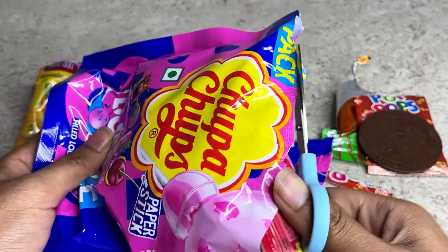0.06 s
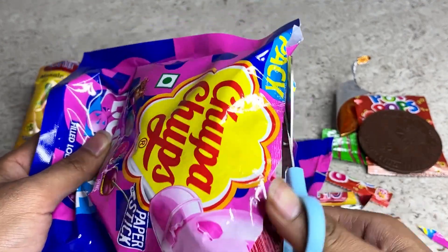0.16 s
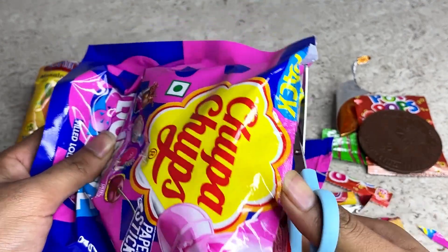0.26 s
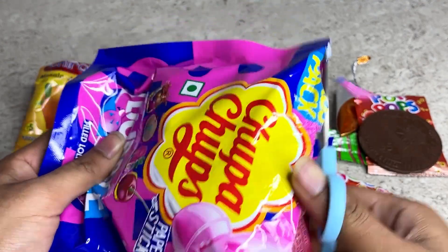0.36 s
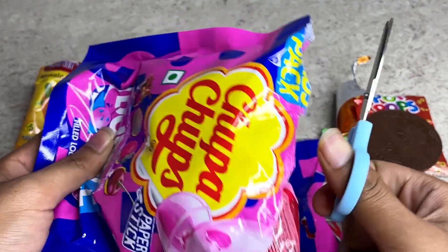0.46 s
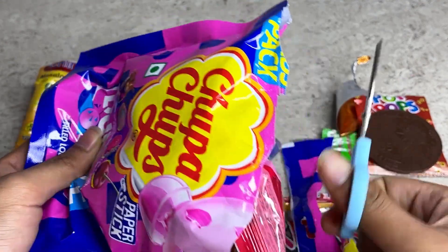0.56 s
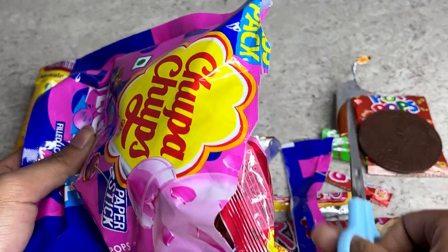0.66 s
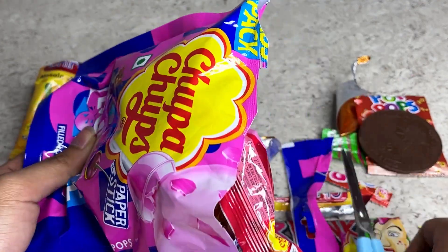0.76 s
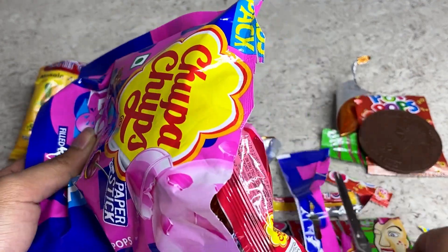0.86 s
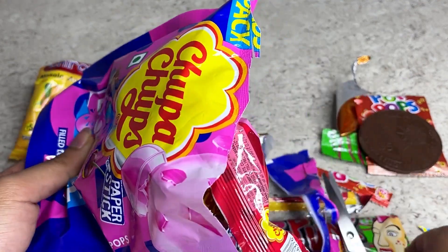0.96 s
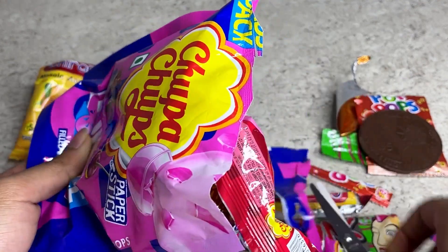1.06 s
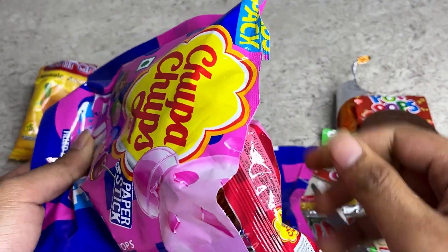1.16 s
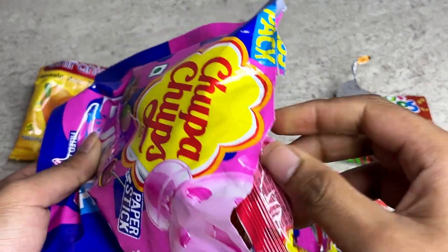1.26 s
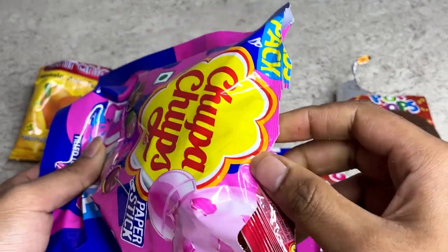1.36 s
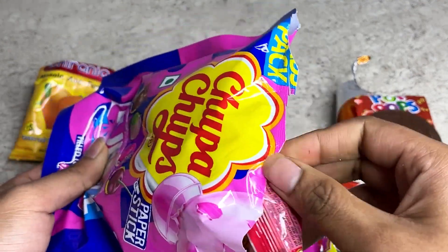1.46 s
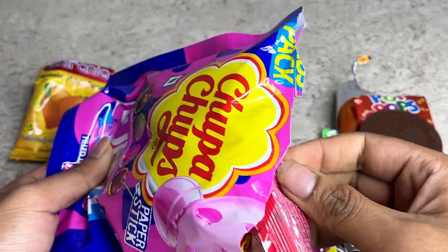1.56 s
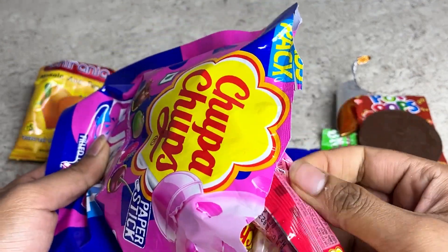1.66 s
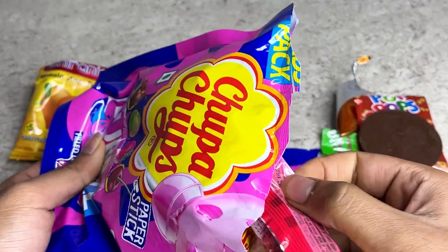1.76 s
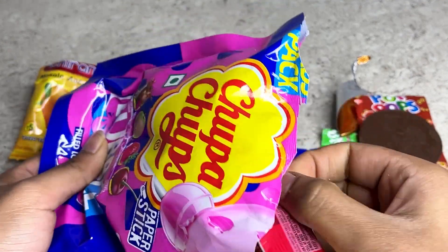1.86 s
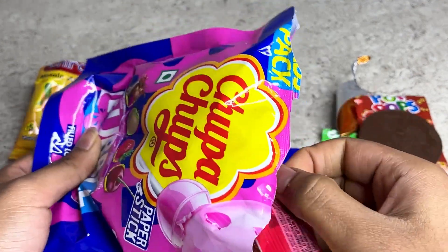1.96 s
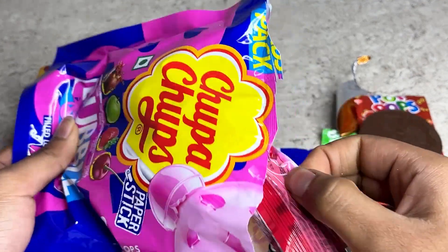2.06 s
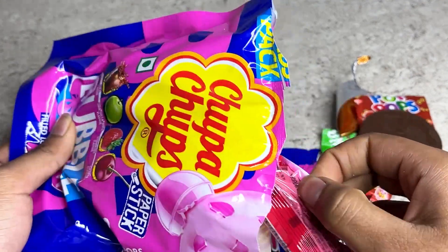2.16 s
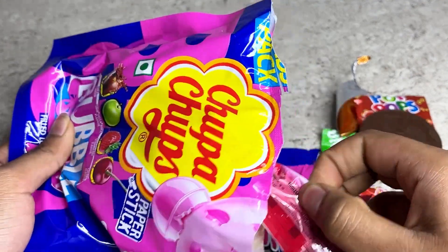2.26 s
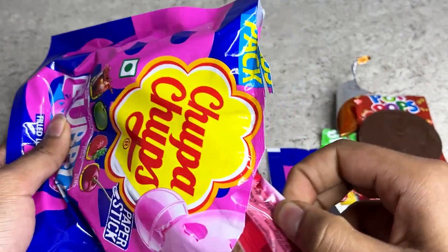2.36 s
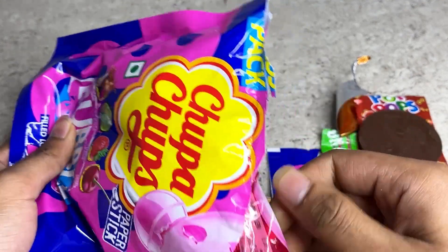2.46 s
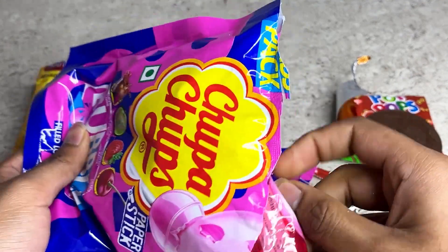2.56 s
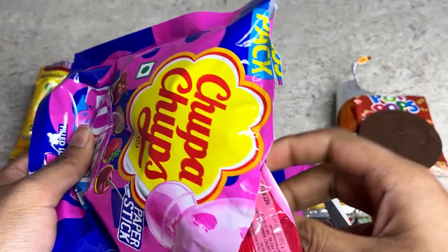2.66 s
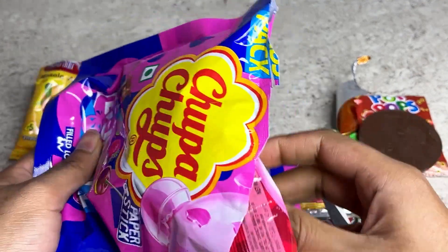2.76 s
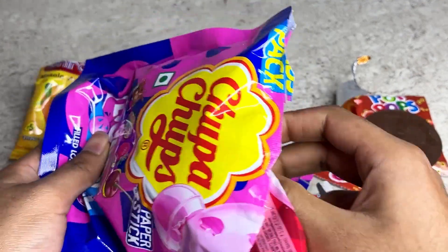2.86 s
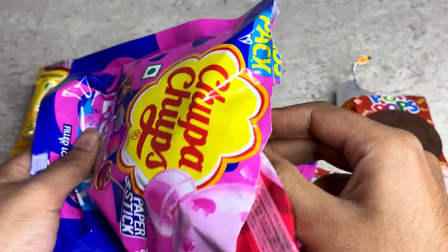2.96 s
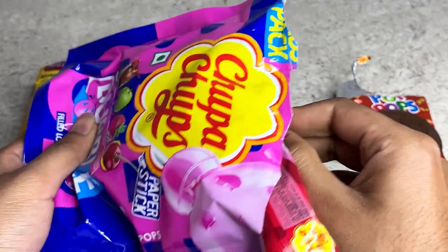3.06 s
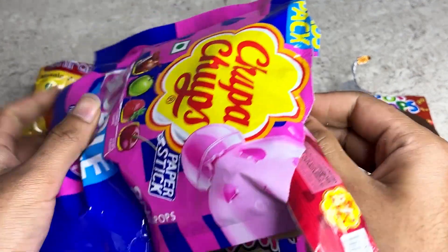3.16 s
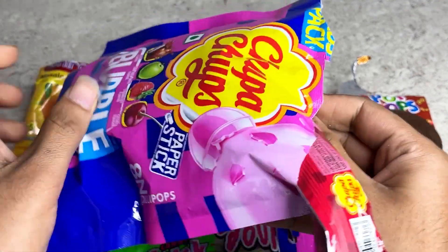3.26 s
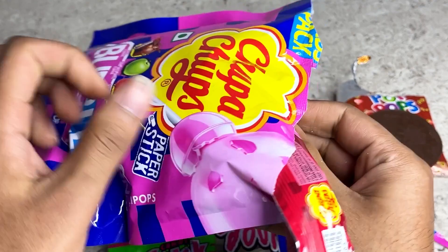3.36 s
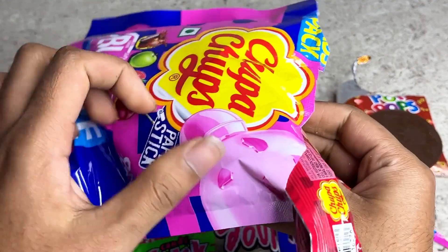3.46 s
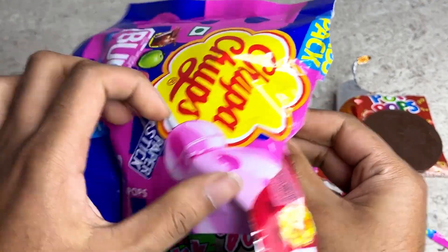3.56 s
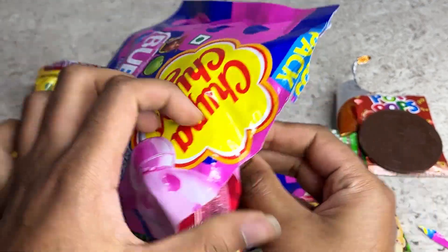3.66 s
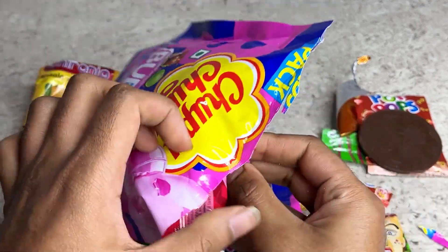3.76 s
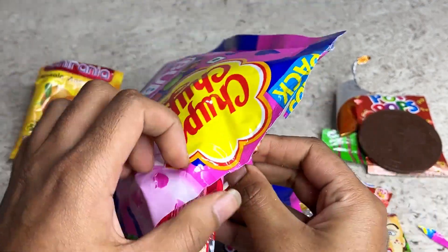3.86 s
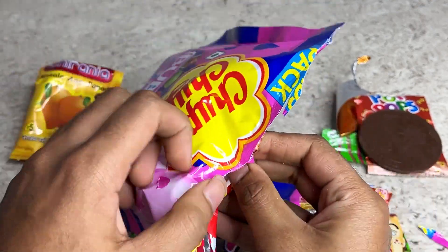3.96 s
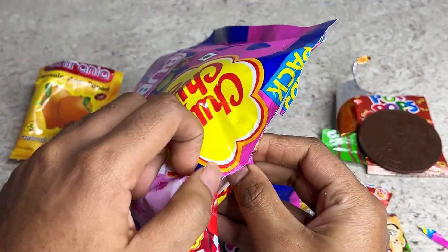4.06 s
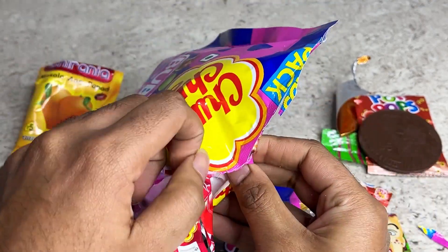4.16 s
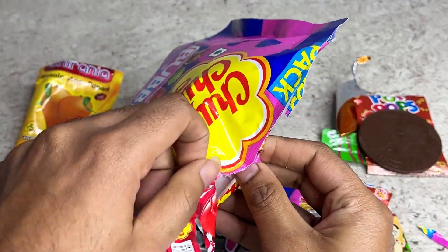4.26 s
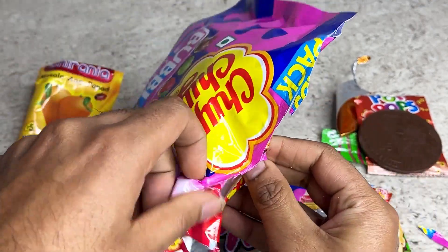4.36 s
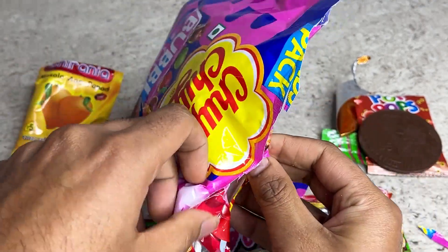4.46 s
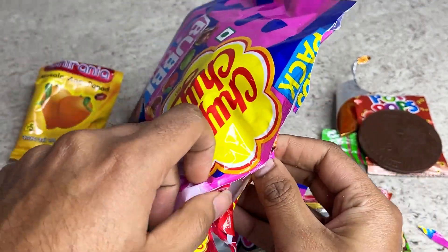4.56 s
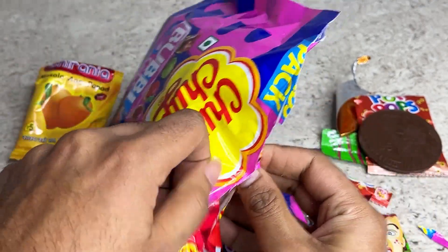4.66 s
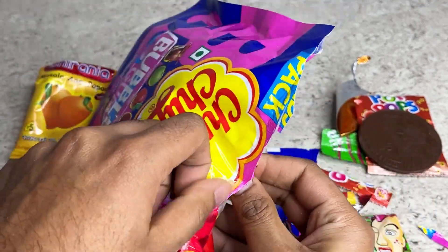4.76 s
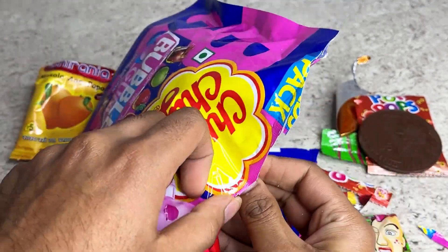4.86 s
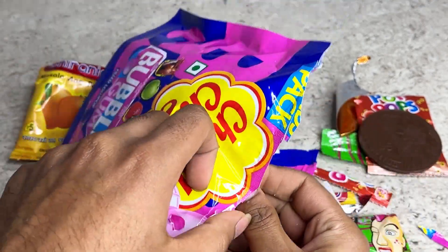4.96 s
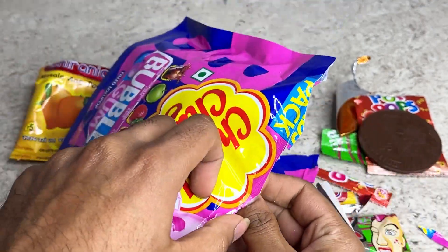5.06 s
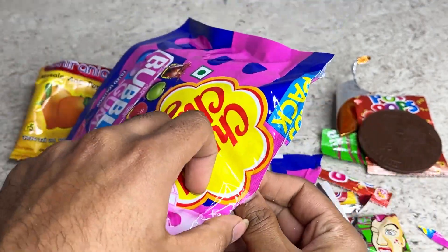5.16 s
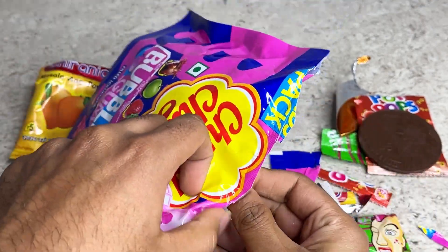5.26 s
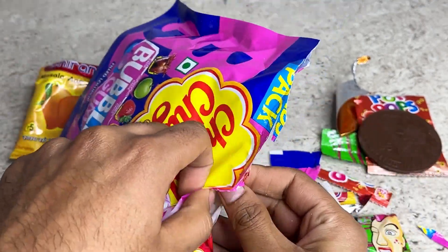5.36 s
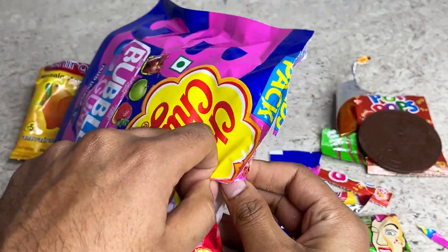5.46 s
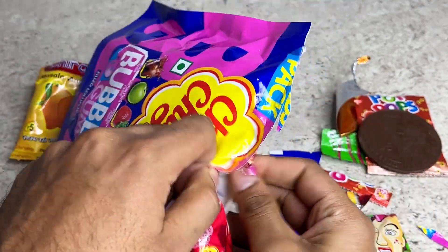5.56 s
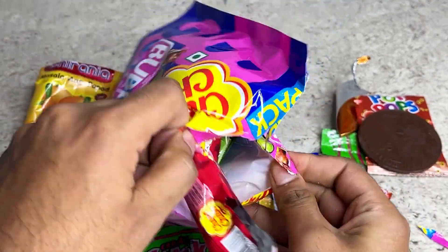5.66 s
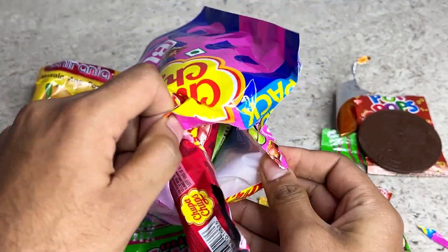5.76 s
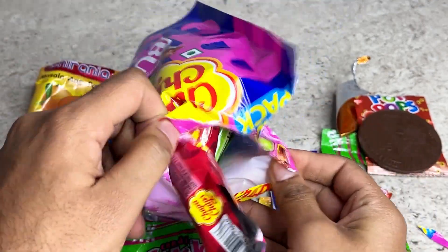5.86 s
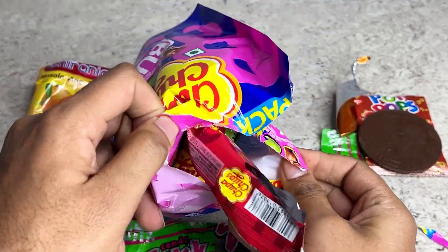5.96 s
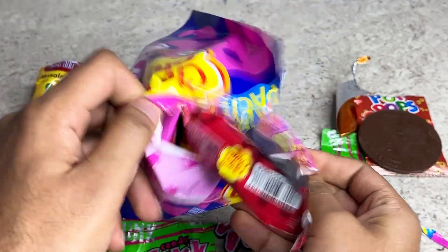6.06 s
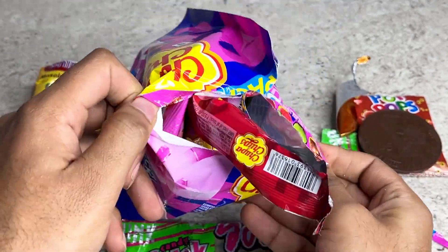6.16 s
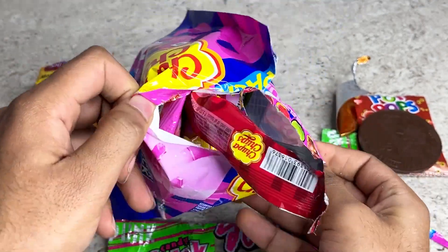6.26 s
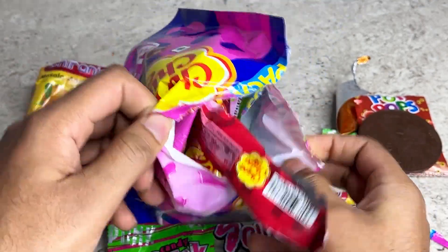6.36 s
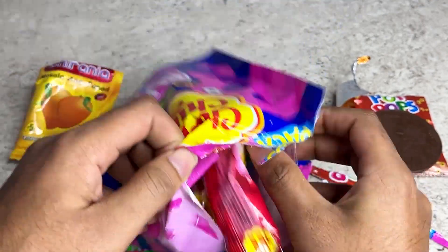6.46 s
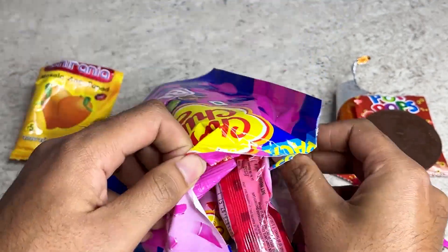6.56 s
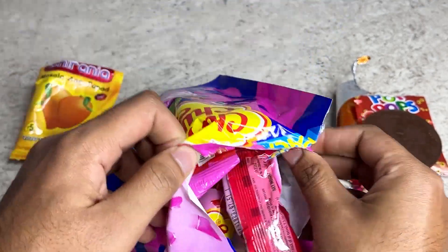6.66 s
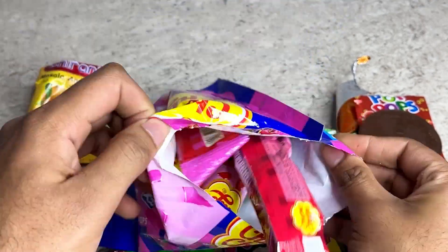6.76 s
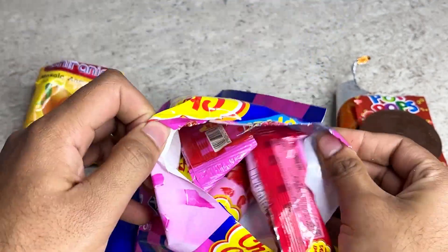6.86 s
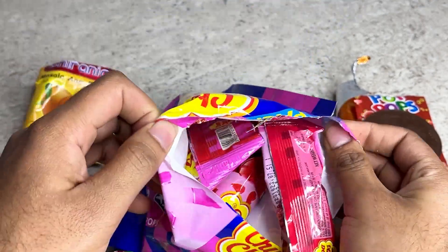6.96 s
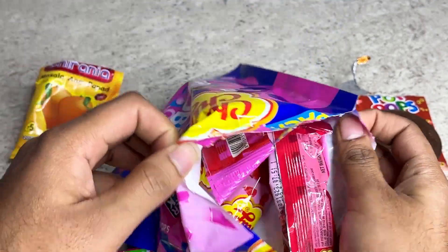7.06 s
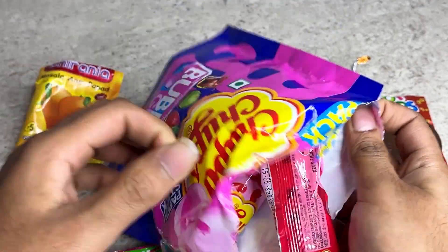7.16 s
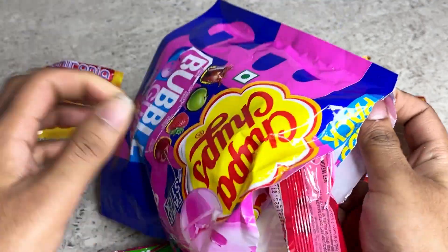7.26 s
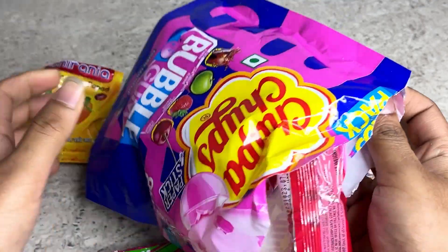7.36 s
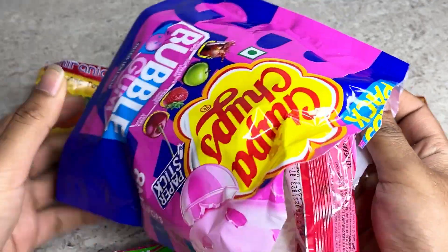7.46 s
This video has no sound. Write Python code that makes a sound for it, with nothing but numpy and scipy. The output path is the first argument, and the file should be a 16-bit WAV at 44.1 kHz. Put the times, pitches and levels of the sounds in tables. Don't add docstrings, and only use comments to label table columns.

```python
import sys
import numpy as np
from scipy import signal
from scipy.fft import rfft, irfft, next_fast_len
from scipy.io import wavfile
from scipy.ndimage import uniform_filter1d

SR = 44100
rng = np.random.default_rng(int(sys.argv[2]) if len(sys.argv) > 2 else 0)


def nominal_scale(level):
    x = np.asarray(level, float) / 20
    return 10 ** x


def to_wav(s):
    ch = np.atleast_2d(s).T
    pcm = np.round(np.clip(ch, -1, 1) * 32767)
    wavfile.write(sys.argv[1], SR, pcm.astype(np.int16))


N = 331191

# (frequency [Hz], level [dB per Hz])
FILM = [(600, -15), (1200, -4), (2800, 6.5), (5000, 10), (8000, 3.5), (12000, -7), (15500, -66)]

# (time [s], peak level [dB], ring frequency [Hz], treble crack re peak [dB])
CUT = [(.0862, -13.5, 2650, -26), (.1124, -13, 1970, 1), (.1336, -14.5, 900, 1), (.1399, -12.5, 3260, -0.5),
       (.2354, -10.5, 1240, -3), (.32, -17.5, 5100, -3), (.3382, -7.5, 2740, -11), (.392, -18, 430, -12),
       (.4777, -19, 3230, -3), (.593, -25.5, 1160, -40), (.6546, -29, 2580, -50), (.724, -27, 1030, -37),
       (.7618, -25, 1320, -32), (.8427, -26, 3010, -21), (.862, -20, 2510, -7), (.875, -29, 2550, 5),
       (.9428, -15, 3920, -4), (1.0452, -10.5, 3600, -12), (1.0734, -8.5, 4870, -25),
       (1.136, -20, 1030, -7)]
# (time [s], peak level [dB], ring frequency [Hz], crack re peak [dB])
REACH = [(1.318, -19, 2620, 3), (1.3399, -19, 4600, 6.5), (1.375, -23, 3140, -6), (1.462, -12, 4900, -2.5),
         (1.5565, -12.5, 4660, -6), (1.5647, -19.5, 1470, 2), (1.6093, -12.5, 4840, -5),
         (1.625, -9.5, 2800, -5), (1.6467, -11.5, 2900, -5), (1.691, -12, 5700, 0.5),
         (1.725, -10.5, 2880, -15), (1.808, -20.5, 2830, -32), (1.8385, -20.5, 2760, 4),
         (1.8717, -14.5, 2920, -16), (1.9789, -16, 3020, -4), (1.9908, -8, 3000, -7.5),
         (1.9997, -14, 2690, -29), (2.0963, -15, 2750, -6), (2.1429, -14, 5440, 6.5),
         (2.1883, -13.5, 4600, 1), (2.204, -11, 4640, -8)]
# (time [s], peak level [dB], ring frequency [Hz], crack re peak [dB])
PULL = [(2.26, -16, 1150, -3), (2.2786, -10, 2290, -10), (2.2895, -4, 4070, -7), (2.4131, -4.5, 4020, -7),
        (2.4957, -10.5, 2140, 1.5), (2.5059, -14.5, 2950, -17), (2.5151, -14, 5060, -8),
        (2.535, -19, 2870, -1), (2.57, -14, 3000, -26), (2.6, -7.5, 3230, -17), (2.6094, -19, 1400, 5),
        (2.625, -4.5, 3000, -21), (2.6305, -13, 2920, 6), (2.7123, -10.5, 2670, -22),
        (2.749, -18, 1090, -5), (2.784, -12.5, 2760, -17), (2.8003, -12.5, 2800, -1),
        (2.8373, -12.5, 2700, -7.5), (2.8526, -17.5, 2680, 1), (2.8945, -5.5, 4400, -14),
        (2.954, -10.5, 2800, -1), (2.975, -12, 3920, -2.5), (3, -8, 2900, -2), (3.0114, -7, 2650, -7),
        (3.0268, -7, 4370, 0), (3.0363, -7.5, 4400, -23), (3.053, -12.5, 2730, 5)]
# (time [s], peak level [dB], ring frequency [Hz], crack re peak [dB])
REGRIP = [(3.1152, -11, 2720, -11), (3.153, -12.5, 2870, -7), (3.212, -10, 4400, 6.5),
          (3.2402, -9, 5740, -13), (3.2649, -5.5, 1820, -24), (3.341, -23, 4440, -3),
          (3.3626, -18, 4500, 3), (3.3684, -15.5, 2230, -3), (3.386, -15.5, 3300, 2.5),
          (3.4315, -11.5, 4000, -7.5), (3.5161, -10.5, 1490, -6.5), (3.601, -18, 3050, -3),
          (3.6388, -21, 2070, 4.5), (3.651, -15, 2840, -10), (3.682, -11.5, 3600, -4.5),
          (3.7297, -16.5, 3600, 6.5), (3.745, -11, 3800, -16), (3.7817, -18, 3600, -0.5),
          (3.96, -21, 5190, -8), (3.989, -10.5, 5170, 0), (4.016, -22, 3700, -15),
          (4.0319, -12.5, 3920, -20), (4.0628, -27, 5600, 14), (4.083, -15, 3540, 3.5),
          (4.1015, -14, 2700, -21), (4.1281, -20.5, 5170, 9.5)]
# (time [s], peak level [dB], ring frequency [Hz], crack re peak [dB])
PINCH = [(4.2409, -13.5, 3330, -4), (4.2787, -21.5, 3360, -8), (4.2945, -11, 4730, -8),
         (4.3804, -13.5, 4840, -7.5), (4.395, -22, 3680, -8), (4.4534, -25, 756, -6), (4.474, -18, 2900, 2),
         (4.5076, -11, 3600, 1.5), (4.5254, -19, 3790, 6), (4.55, -13, 5300, 0), (4.6529, -11, 4130, -5),
         (4.69, -12.5, 2220, -1.5), (4.7938, -21.5, 4270, -8), (4.806, -20.5, 3880, -15),
         (4.831, -17.5, 4050, -7), (4.892, -18.5, 3830, -7.5), (4.935, -26, 3030, -8),
         (5.087, -23.5, 4730, 7.5), (5.2036, -20.5, 4560, -30), (5.2389, -17, 5440, -4),
         (5.2533, -17, 2570, -3), (5.2793, -13.5, 1740, -3), (5.323, -5, 4570, -12)]
# (time [s], peak level [dB], ring frequency [Hz], crack re peak [dB])
TEAR = [(5.4306, -14, 1770, -1), (5.4818, -11.5, 3400, -9.5), (5.535, -14, 4400, -21),
        (5.5457, -2.5, 3300, -6), (5.5549, -4, 3120, -4), (5.5825, 0, 4170, -5), (5.595, -2, 2970, -4.5),
        (5.601, -20, 1990, -19), (5.6254, -3.5, 1640, -18), (5.6393, -7, 3100, -1), (5.792, -35, 5000, 8),
        (5.8561, -3, 834, -20), (5.869, -7, 2600, -7), (5.996, -23.5, 4800, -0.5), (6.0338, -5, 2580, -13),
        (6.0544, -14, 2900, -22), (6.0669, -4, 2930, -12), (6.0717, -6, 2860, -22), (6.101, -17, 3000, 6.5),
        (6.2665, -10.5, 2730, -6), (6.294, -10.5, 4500, -4), (6.3554, -9, 5200, -9)]
# (time [s], peak level [dB], ring frequency [Hz], crack re peak [dB])
SPREAD = [(6.4575, -17, 5040, 1.5), (6.4818, -21, 2820, 1), (6.594, -18.5, 1100, -0.5),
          (6.618, -12, 4850, -9), (6.6711, -8, 4770, 9.5), (6.7228, -4.5, 5150, -4.5),
          (6.7562, -14, 5060, 4.5), (6.8323, -12, 2800, -9), (6.906, -7.5, 4970, -6),
          (7.0535, -10.5, 2920, -6), (7.0725, -27.5, 1610, 11), (7.13, -11.5, 2900, -1),
          (7.167, -5, 5270, -10.5), (7.1976, -15, 4780, -9), (7.2343, -10.5, 3150, -10.5),
          (7.3107, -20, 4830, -11), (7.423, -36, 2760, -35), (7.477, -30, 452, -25),
          (7.477, -28.5, 3000, -34), (7.503, -34, 4000, -4)]
# (time [s], peak level [dB], ring frequency
# [Hz], crack re peak [dB])
MORE_CREASES = [(0.0138, -17.5, 2500, -6), (0.0396, -23, 764, -16), (0.0507, -22, 2690, -6),
                (0.1054, -13, 2020, -11), (0.1455, -23, 4000, 5), (0.251, -11, 4100, -2.8),
                (0.276, -23, 4000, 4), (0.3171, -14.5, 2840.0, -2), (0.3353, -11, 2950, -9),
                (0.357, -12, 2690, -9), (0.3633, -16, 770, -4), (0.3664, -13, 4910.0, -2),
                (0.3742, -25, 940, -2), (0.4011, -13.5, 1940.0, -19), (0.406, -20.5, 1110, -19),
                (0.5826, -31, 2620, -24), (0.795, -33, 2840.0, -11), (0.891, -28, 4610.0, 13),
                (0.9191, -36, 4390.0, 10), (0.9284, -31, 4440.0, 10), (1.017, -22.5, 2000, -3),
                (1.0325, -27, 2200.0, 4), (1.067, -14, 2870, -10), (1.1783, -23, 2760.0, 0),
                (1.259, -29.5, 1490, -2), (1.2822, -29, 1150, -8), (1.4501, -23, 4900, -11),
                (1.4658, -25, 2820, -4), (1.5194, -27, 2170, -31), (1.62, -17.5, 4840, 5),
                (1.7994, -21, 1036, -22), (1.8309, -18.5, 1480, -17), (1.8466, -31, 2710.0, -5),
                (1.887, -21, 1040, -10), (2.0087, -26, 2800.0, -4), (2.0347, -13.5, 2850, -6),
                (2.1839, -19, 2670.0, -8), (2.2154, -16, 2450, -29),
                (2.2947, -22, 2020, -17), (2.35, -24, 4000, 4.5), (2.324, -19, 1590.0, -4),
                       (2.4214, -22, 1640, 4), (2.429, -21, 2310, -7), (2.483, -25, 3230.0, -12),
                       (2.5184, -12, 4820.0, -8), (2.5606, -24, 2050, -14), (2.618, -23, 3620.0, -11),
                       (2.688, -27, 3000, 1.5), (2.7045, -32, 5000, 7), (2.7742, -18, 2700, -26),
                       (2.946, -12, 2860, -2.5), (2.9613, -18, 1180, -15), (2.983, -9.5, 2850, -21),
                       (3.063, -17, 5040.0, -12), (3.1462, -15, 2800, -13), (3.164, -18, 2950, -7),
                       (3.237, -22, 1080.0, 6), (3.25, -17, 1210, -20), (3.3431, -17, 1090, -19),
                       (3.349, -13, 2200.0, -19), (3.5112, -12.5, 1090, -22), (3.621, -20, 4030, 0.5),
                       (3.629, -15.5, 1650, -8), (3.725, -14, 2340, -7), (3.7385, -31, 640, -20),
                       (3.7909, -13, 3000, -5), (3.883, -20, 3080, -12), (3.9408, -20, 3620.0, -14),
                       (3.985, -23, 1570, 1), (4.0048, -13, 4010.0, -20), (4.078, -18, 760, 0),
                       (4.1846, -21.5, 5120.0, -6),
                (4.2753, -26, 776, -11), (4.5005, -25, 1560, -5), (4.5117, -20, 3660.0, -6),
                     (4.578, -25.5, 1040, 8), (4.614, -27, 3000, 2), (4.646, -16.5, 3300, 0),
                     (4.659, -22, 2330, -8), (4.686, -21, 2500, -2), (4.7312, -19.5, 1370, -20),
                     (4.7753, -25, 3040, -17.7), (4.9137, -24, 3270.0, -5), (4.9226, -27, 2410.0, -13),
                     (4.978, -30, 2280.0, -24), (5.001, -30, 1200, -14), (5.0909, -22, 2970.0, -21),
                     (5.1665, -23.5, 3050, -5), (5.2582, -8, 3100.0, -3.5), (5.312, -20, 1090, -18),
                     (5.318, -15, 4610.0, 0), (5.465, -13.5, 2840, -18), (5.495, -10, 4630, -22),
                     (5.5615, -16, 730.0, -2), (5.572, -8, 3190.0, -4), (5.5778, -13, 840, 0),
                     (5.586, -4.5, 3000, -10.5), (5.598, -16, 1660, -8), (5.6427, -5, 3270.0, -5),
                     (5.657, -13, 2930, -3), (5.9246, -16.5, 2970.0, -5), (6.033, -8, 755, -18),
                     (6.0461, -4.5, 3000, -13), (6.327, -21, 1520, 0), (6.3792, -18.5, 2580, 4.5),
                     (6.3865, -25, 3000, -3), (6.4685, -16, 2560, -1), (6.511, -20, 4350.0, -5),
                     (6.6366, -21.5, 3020, 1), (6.6634, -33, 1080.0, -20), (6.7103, -9, 3540, -5),
                     (6.7298, -9.5, 3010.0, 4.5), (6.7381, -21, 2670.0, -17), (6.7737, -15, 4800, 7),
                     (6.83, -13.5, 2880, -1.5), (6.8688, -19.5, 2730, 6), (7.0588, -13.5, 3080, -14),
                     (7.1162, -15, 1250, -15), (7.124, -21, 1120, -25), (7.1712, -19.5, 3140.0, 1)]
# (time [s], peak level [dB], ring frequency [Hz], crack re peak
# [dB])
KNOCKS = [
    (1.566, -21, 390, -20),
    (3.513, -18, 410, -23),
    (4.92, -27, 420, -20),
    (5.843, -19, 4500, -10),
]
CREASES = CUT + REACH + PULL + REGRIP + PINCH + TEAR + SPREAD + MORE_CREASES + KNOCKS


def rms_one(x):
    return x / np.sqrt(np.mean(x ** 2) + 1e-20)


def at_hz(points, hz):
    table_hz, value = np.array(points).T
    return np.interp(np.log(hz + 1), np.log(table_hz + 1), value)


def shaped(x, response):
    size = next_fast_len(N + 4096)
    hz = np.arange(size // 2 + 1) * SR / size
    return irfft(rfft(x, size) * response(hz), size)[..., :N]


def drift(rate_hz):
    r = np.exp(-2 * np.pi * rate_hz / SR)
    return rms_one(signal.lfilter([1], [1, -2 * r, r * r], rng.standard_normal(N + SR))[SR:])


def far_rumble():
    # (frequency [Hz], level [dB per Hz])
    floor_color = [(33, -13), (48, 17.5), (75, 8), (120, 6), (170, -16), (420, -8), (1800, -33),
                   (9000, -50)]
    # (time [s], level [dB])
    swell = [(0, 0), (.8, 2), (1.4, 0), (2.0, 3), (3.5, 5), (4.05, 2), (4.7, -1), (6.1, 6), (7.51, -0.5)]
    noise = shaped(rng.standard_normal((2, N)), lambda hz: nominal_scale(at_hz(floor_color, hz)))
    swell_db = np.interp(np.arange(N) / SR, *np.transpose(swell))
    return nominal_scale(-58.5 + swell_db + 2.0 * drift(8.0)) * rms_one(noise)


def room_tail(start_s):
    # (frequency [Hz], t60 [s])
    decay = [(200, 0.41), (700, 0.34), (2500, 0.5), (6000, 0.15), (14000, 0.31)]
    t = np.arange(round(.6 * SR)) / SR
    out = 0
    for hz in 125 * 2 ** np.arange(8):
        octave_hz = [hz / 2 ** .5, min(hz * 2 ** .5, .45 * SR)]
        band = signal.butter(2, octave_hz, "band", fs=SR, output="sos")
        noise = signal.sosfilt(band, rng.standard_normal(len(t)))
        out = out + noise * nominal_scale(-60 * t / at_hz(decay, hz))
    out = out * (1 - np.exp(-t / start_s))
    return out / np.sqrt(np.sum(out ** 2))


def hush():
    marks = np.zeros(N)
    marks[(np.array(CREASES)[:, 0] * SR).astype(int)] = 1
    strain = np.linspace(1, 0, 450)
    before_snap = signal.fftconvolve(marks[::-1], strain)[:N][::-1]
    return -9 * np.minimum(before_snap, 1)


def buckles(per_s, spread_db, clump_db, low_hz, high_hz, cycles, uneven_db):
    sizes = nominal_scale(spread_db * np.minimum(rng.exponential(1, N), 2.2))
    born = rng.random(N) < per_s * nominal_scale(clump_db * drift(20)) / SR
    strengths = rng.standard_normal(N + 16)
    out = 0
    for k, hz in enumerate(np.geomspace(low_hz, high_hz, 16)):
        r = nominal_scale(-60 * hz / (cycles * SR))
        w = 2 * np.pi * hz / SR
        share = nominal_scale(uneven_db * strengths[k:k + N]) * (-1) ** k
        gain = np.sin(w) * hz * nominal_scale(at_hz(FILM, hz))
        hits = sizes * born * share + 1e-18
        out = out + signal.lfilter([0, gain], [1, -2 * r * np.cos(w), r * r], hits)
    return rms_one(out)


def rustle():
    # (time [s], rustle level [dB], bag wall re rustle [dB])
    grip = [(0, -64, -6), (.45, -59, -2), (.7, -80, 17), (.84, -69, -16), (.9, -44, -38),
            (1.25, -61.5, 5.5), (1.9, -57, 12.5), (2.2, -51, 0), (3.3, -52.5, 7.5), (4.2, -61.5, 14),
            (4.7, -51, -0.5), (5.07, -69.5, 13.5), (5.25, -50.5, 2.5), (6.62, -56, 12.5), (6.72, -34, -2.5),
            (7.25, -64.5, 13.5), (7.459, -81.5, 19)]
    # (time [s], rustle level [dB], build-up [s], bag wall re rustle [dB])
    jerks = [(0.028, -47.5, 0.42, 9.5), (.14, -52.5, 0.2, 8.5), (0.367, -36, 0.23, 6.5),
             (0.864, -42.5, 0.0065, -32), (1.07, -56, 0.14, 8), (1.33, -61.5, 0.47, 8.5),
             (1.462, -48.5, 0.009, 6.5), (1.634, -40, 0.09, 0), (2.004, -39, 0.058, 6.5),
             (2.419, -57, 0.22, 15), (2.521, -39, 0.045, -7), (2.628, -39, 0.083, -2), (2.81, -46, 0.5, 6),
             (3.031, -31.5, 0.056, -2.5), (3.373, -45.5, 1, 7.5), (3.512, -41, 0.029, 7),
             (3.738, -45, 0.2, 3), (4.09, -46.5, 0.72, -4), (4.39, -53, 0.43, 3),
             (4.51, -39.5, 0.095, -1.5), (4.693, -46.5, 0.5, 8), (5.255, -30.5, 0.023, -5),
             (5.611, -28.5, 0.14, 6), (5.855, -32.5, 0.014, 8), (6.037, -23, 0.0062, 9),
             (6.496, -39, 0.24, 5), (6.674, -31.5, 0.044, 10), (7.165, -42, 0.24, 10)]
    build_up_db, hold_s, let_go_db_per_s = 35.5, 0.0044, 362
    fine_high_hz, wall_low_hz = 9000, 143
    t = np.arange(N) / SR
    grip_s, grip_db, grip_wall_db = np.transpose(grip)
    fine_power = nominal_scale(np.interp(t, grip_s, grip_db - 3.5)) ** 2
    wall_power = fine_power * nominal_scale(np.interp(t, grip_s, grip_wall_db)) ** 2
    for s, db, build_s, wall_db in jerks:
        rise_db = build_up_db * (s - t) / max(build_s, .002)
        fall_db = let_go_db_per_s * np.maximum(t - s - hold_s, 0)
        power = nominal_scale(db - np.where(t < s, rise_db, fall_db)) ** 2
        fine_power = fine_power + power
        wall_power = wall_power + power * nominal_scale(wall_db) ** 2
    fine = buckles(800, spread_db=3.5, clump_db=5.0, low_hz=800, high_hz=14000, cycles=9.0, uneven_db=5.0)
    wall = buckles(800, spread_db=1.0, clump_db=2.0, low_hz=244, high_hz=900, cycles=2.0, uneven_db=4.0)
    fine = shaped(fine, lambda hz: 1 / (1 + 1j * hz / fine_high_hz))
    wall = shaped(wall, lambda hz: 1 / (1 - 1j * wall_low_hz / (hz + 1)))
    return nominal_scale(hush()) * (nominal_scale(10.0) * np.sqrt(fine_power) * fine + np.sqrt(wall_power) * wall)


def rings(hz, db, cycles, rise_s, t, phase):
    hz = hz[..., None]
    decay = nominal_scale(db[..., None] - 60 * t * hz / cycles)
    body = np.sin(2 * np.pi * (hz * t + phase[..., None])) * decay
    return body.sum(axis=1) * (1 - np.exp(-t / rise_s)) ** 2


def crease_snaps():
    s, peak_db, hz, crack_db = np.transpose(CREASES)[:, :, None]
    t = np.arange(1400) / SR
    u = rng.random((len(s), 5, 16))

    patch_cycles = np.sqrt(hz[..., None] / 36)
    patch = rings(hz, peak_db + 7.0, patch_cycles, .0008, t, u[:, 0, :1])

    near_hz = 600 * 11 ** ((np.arange(16) + u[:, 1]) / 16)
    uneven_db = 10 * u[:, 2] - 5 * np.abs(np.log2(near_hz / hz))
    near_db = peak_db - 12 + at_hz(FILM, near_hz) + uneven_db
    neighbours = rings(near_hz, near_db, 15.0, .0007, t, u[:, 3])

    wall_hz = 280 * 4.03 ** u[:, 4, :3]
    wall_db = peak_db - 25 + 12 * u[:, 4, 3:6]
    wall = rings(wall_hz, wall_db, 5.0, .001, t, u[:, 0, 3:6])

    treble = signal.butter(2, [5500, 14300], "band", fs=SR, output="sos")
    middle = signal.butter(1, [1200, 5000], "band", fs=SR, output="sos")
    white = rng.standard_normal((len(s), len(t)))
    crack = signal.sosfilt(treble, white) * nominal_scale(peak_db + crack_db + 13 - 60 * t / .004)
    crack = crack * (1 - np.exp(-t / .00079)) ** 2
    shiver = signal.sosfilt(middle, white) * nominal_scale(peak_db - 17 - 60 * t / .03) * (1 - np.exp(-t / .0015))

    out = np.zeros(N + SR)
    at = np.round((s - .0003) * SR).astype(int) + np.arange(len(t))
    np.add.at(out, at, patch + neighbours + wall + shiver)
    np.add.at(out, at - round(.0004 * SR), crack)
    return out[:N]


def scene():
    # (frequency [Hz], level re shared sound [dB])
    unshared = [(40, -20), (250, -14), (700, -10.5), (1500, -7.5), (2800, -12), (6900, -17), (8000, -10),
                (13000, -15)]
    bag = crease_snaps() + rustle()
    room = nominal_scale(-9) * signal.fftconvolve(bag, room_tail(.00033))[:N]
    shared = bag + room
    rumble = far_rumble()
    place = drift(60)
    scattered = shared * (place - uniform_filter1d(place, size=5000))
    side = shaped(scattered + rumble[1], lambda hz: nominal_scale(at_hz(unshared, hz)))
    return np.array([shared + rumble[0] + side, shared + rumble[0] - side])


def top_cut(x):
    return signal.sosfilt(signal.butter(12, 16990, fs=SR, output="sos"), x)


def record(dry):
    # (frequency [Hz], left lead [rad])
    port_phase = [(4950, -.15), (5340, 1.9), (6600, 2.3), (7800, 5.6), (9560, 6.5), (11900, 9.0),
                  (13200, 9.6), (15800, 12.5)]
    # (frequency [Hz], left re right [dB])
    port_balance = [(60, 0.0), (130, -0.5), (290, -0.5), (640, -1.0), (1410, -1.5), (3100, 1.0),
                    (6820, 0.0), (15000, 0.0)]
    half = np.array([[.5], [-.5]])
    rounded = .95 * np.tanh(dry / .95)

    def port_response(hz):
        return np.exp(1j * half * at_hz(port_phase, hz)) * nominal_scale(half * at_hz(port_balance, hz))

    mix = shaped(rounded, port_response)
    mix = signal.sosfilt(signal.cheby2(8, 24, 16000, fs=SR, output="sos"), mix)
    mix = signal.sosfilt(signal.butter(4, 38, "high", fs=SR, output="sos"), mix)
    return top_cut(mix)


dry = scene()
out = record(dry)
to_wav(out)
```